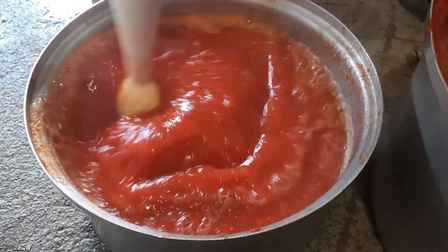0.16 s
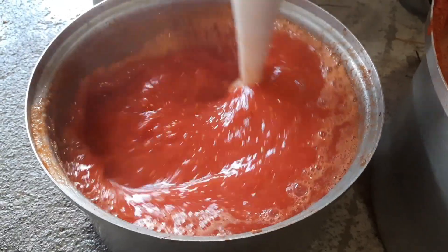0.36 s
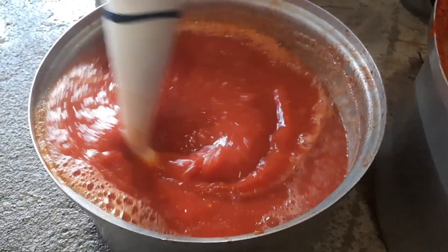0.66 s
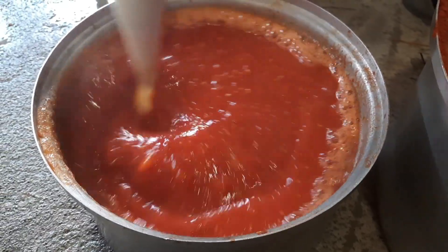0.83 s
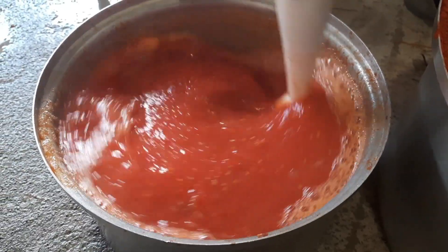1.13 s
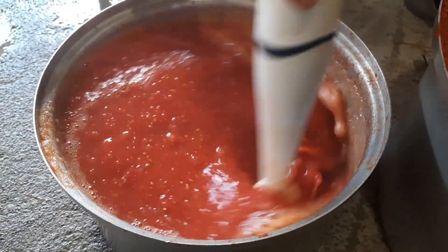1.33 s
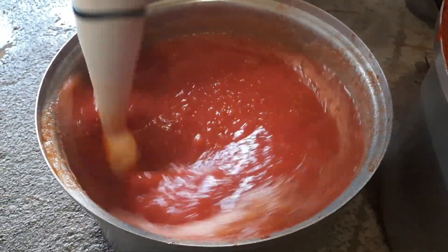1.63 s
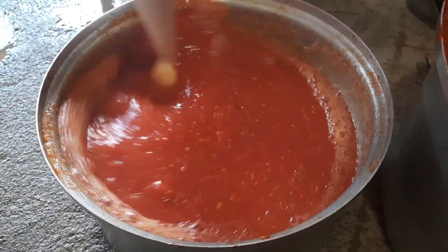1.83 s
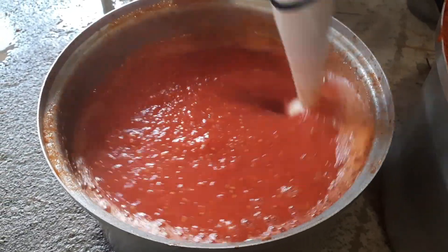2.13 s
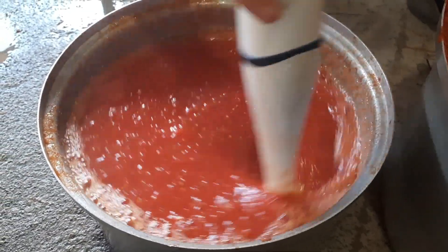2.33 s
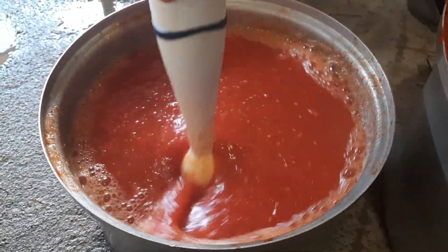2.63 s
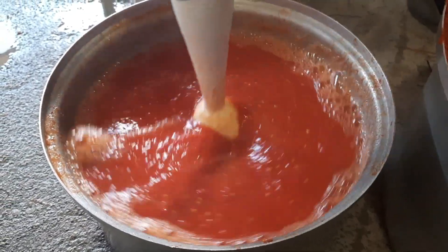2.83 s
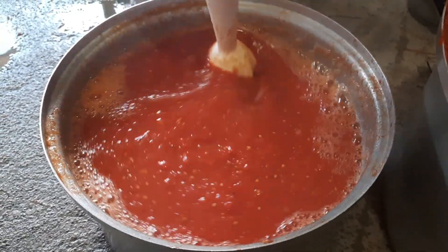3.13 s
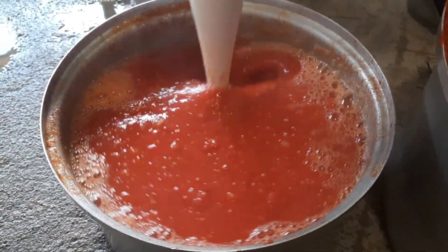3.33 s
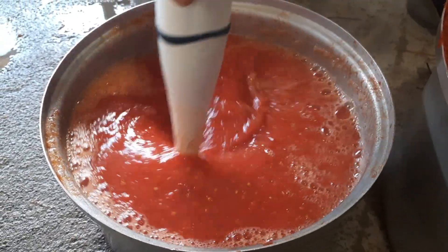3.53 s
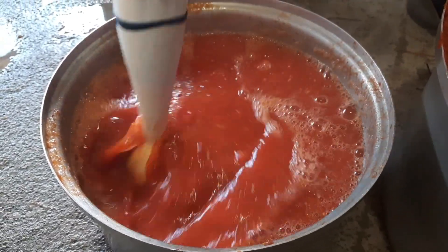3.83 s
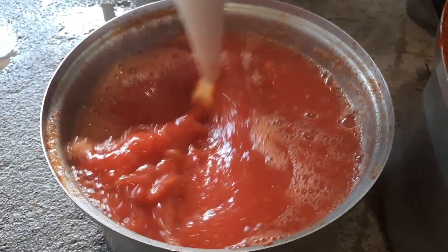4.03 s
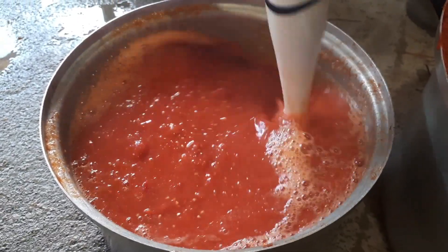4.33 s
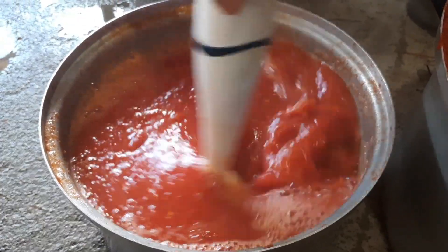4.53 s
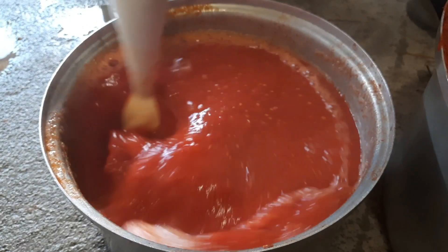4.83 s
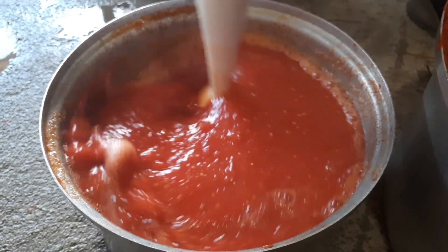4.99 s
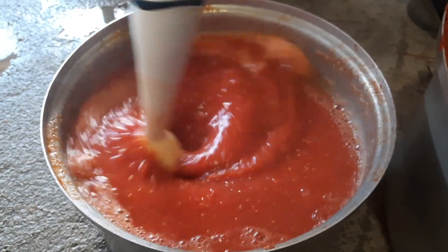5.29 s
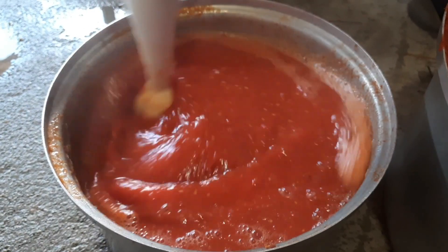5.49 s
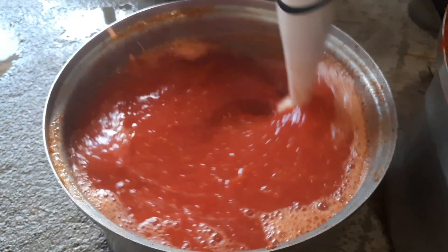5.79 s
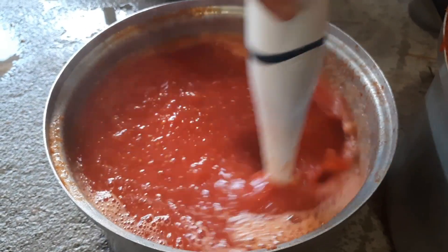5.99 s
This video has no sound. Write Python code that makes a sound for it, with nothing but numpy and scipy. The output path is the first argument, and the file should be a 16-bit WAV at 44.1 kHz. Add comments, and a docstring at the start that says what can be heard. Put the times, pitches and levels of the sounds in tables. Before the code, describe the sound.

The foot of a hand blender is dragged around a large steel pot of thick puree in uneven stop-start strokes. Each stroke is a hissing, gritty scrape, and the pot booms low beneath it. One thin, high squeak comes early. Small bubble ticks and soft bumps fill the pauses, and a few sharp clicks come in the second half. It is heard up close in a quiet, faintly humming kitchen.

```python
"""Hand blender in a steel pot

The foot of a blender is swept in stop-start strokes round a large pot of thick puree. Sliding friction
drives the steel: the low modes boom, the upper modes colour a scraping hiss, and grit rasps where the
foot presses. Stick-slip gives one squeak; bubbles tick and the foot bumps, mostly in the pauses.
A quiet kitchen hums behind, and two spaced microphones stand close to the pot."""
import sys
import numpy as np
from scipy import signal
from scipy.fft import rfft, irfft, next_fast_len
from scipy.io import wavfile
from scipy.ndimage import uniform_filter1d, map_coordinates

SR = 44100
rng = np.random.default_rng(int(sys.argv[2]) if len(sys.argv) > 2 else 0)


def wav_out(sig):
    """Save sig, one row per channel (or a flat mono array), as 16-bit PCM at SR to the path in sys.argv[1]."""
    wavfile.write(sys.argv[1], SR, np.round(np.clip(np.atleast_2d(sig).T, -1, 1) * 32767).astype(np.int16))


N = 271203
SQUEAK_FROM_S, SQUEAK_TO_S = 1.335, 1.75


def amp(db):
    """Amplitude ratio of a level in decibels."""
    return 10 ** (np.asarray(db) / 20)


def unit(x):
    """Normalisation to unit RMS."""
    return x / np.sqrt(np.mean(x ** 2) + 1e-20)


def along(points, hz):
    """Interpolation of (f/Hz, value) points on a logarithmic frequency axis."""
    f, v = np.transpose(points)
    return np.interp(np.log(hz + 1), np.log(f + 1), v)


def wobble(rate, count=N):
    """Smooth random modulation with `rate` knots a second."""
    knots = rng.standard_normal(int(count * rate / SR) + 4)
    return map_coordinates(knots, [np.arange(count) * rate / SR])


def hump(start, end, power, count=N):
    """Half-sine envelope between two times, raised to a power."""
    out, n = np.zeros(count), np.arange(max(round(start * SR), 0), min(round(end * SR), count))
    out[n] = np.abs(np.sin(np.pi * (n / SR - start) / (end - start))) ** power
    return out


def filtered(x, response):
    """Linear filtering: the spectrum of x times a frequency response."""
    m = next_fast_len(N + SR // 2)
    return irfft(rfft(x, m) * response(np.fft.rfftfreq(m, 1 / SR)), m)[..., :N]


def kitchen():
    """Ambient noise: a low hum and a faint hiss, wavering in level."""
    # room noise spectrum: f/Hz, relative level/dB
    spectrum = [(15, -53.5), (25, -41.5), (55, -22), (99, -10.5), (122, -15.5), (160, -31), (221, -23),
                (1150, -41), (2020, -36.5), (2350, -37), (2700, -51.5), (3650, -56), (3980, -37.5),
                (4350, -47), (15600, -49.5)]
    air = filtered(rng.standard_normal((2, N)), lambda hz: amp(along(spectrum, hz)))
    return amp(-58.5 + 1.5 * wobble(14)) * unit(air)


def ticks():
    """Impulsive excitation: bursting bubbles and snapping grit crack, and the pot answers faintly."""
    # cracks: t/s, peak level/dB, f/Hz, level of the duller part re the crack/dB
    cracks = [(.8854, -50, 7400, -3), (.8966, -41, 4500, 6), (.9445, -39, 8500, -20),
              (2.0572, -48, 5400, 8), (2.253, -43, 4800, 2), (3.8796, -43, 8100, -8), (3.886, -38, 900, -6),
              (3.8964, -47, 4900, 2), (4.307, -19, 4000, -10), (4.443, -19, 4000, -6),
              (4.7067, -33, 12000, -8), (4.8842, -29, 8700, -3), (4.931, -44, 11000, -20),
              (4.9445, -38, 9000, -8), (5.4995, -46, 5300, 10), (5.5785, -36, 8800, -8),
              (5.585, -35, 8000, -6), (5.601, -44, 9000, -15), (5.63, -45, 13000, -25),
              (5.679, -41, 6000, -10), (4.5455, -8, 3800, -12), (4.633, -22, 9500, 7),
              (5.2915, -10, 3600, -8), (5.2925, -19, 11000, -20), (5.305, -21, 10000, -10)]
    out, t = np.zeros((2, N + SR)), np.arange(SR // 12) / SR
    envelope = amp(-60 * t / .009) * (1 - np.exp(-t / .0004)) + amp(-24 - 60 * t / .12)  # crack + tail

    def band(hz, relative_width):
        peak = signal.iirpeak(hz, 1 / relative_width, SR)
        burst = envelope * rng.standard_normal((2, len(t)))
        x = signal.lfilter(*peak, signal.lfilter(*peak, burst))
        return x / np.abs(x).max()
    for s, db, hz, dull_db in cracks:
        tick = band(hz, .9) + amp(dull_db) * (band(2300, .73) + .7 * band(1100, .8))
        out[:, round(s * SR):][:, :len(t)] += amp(db) * tick
    return out[:, :N]


def bumps():
    """Damped oscillation: the foot knocks on the bottom, and the puree soon absorbs the motion."""
    # soft knocks: t/s, relative level/dB
    knocks = [(2.064, -28.5), (2.266, -27.5), (2.287, -30.5), (2.376, -40)]
    out, t = np.zeros(N + SR), np.arange(SR // 10) / SR
    ring = amp(2 - 60 * t / .071) * (1 - np.exp(-t / .0049)) * np.sin(2 * np.pi * 205 * t)
    for s, db in knocks:
        out[round(s * SR):][:len(t)] += amp(db) * ring
    return out[:N]


def squeak():
    """Stick-slip oscillation: the wet foot catches and slides at a rate that climbs, then drops."""
    crest_s, crest_hz, climb_hz_s2, drop_hz_s2 = 1.55, 5250, 15000, 32000
    t = np.arange(N) / SR
    hz = crest_hz - np.where(t < crest_s, climb_hz_s2, drop_hz_s2) * np.clip(t - crest_s, -.3, .3) ** 2
    phase = 2 * np.pi * np.cumsum(hz * (1 + .006 * wobble(100))) / SR
    fundamental_db = -36 - 28 * np.clip(t - SQUEAK_FROM_S, 0, 1)
    tone = amp(fundamental_db) * np.sin(phase) + amp(-59) * np.sin(2 * phase)
    return hump(SQUEAK_FROM_S, SQUEAK_TO_S, .27) * amp(2 * wobble(45)) * tone


def low_mode(hz, width_hz, purity, count=N):
    """A randomly driven resonance: a steady tone of weight `purity` plus narrow-band noise."""
    phase = 2 * np.pi * hz * np.arange(count) / SR
    in_phase, quadrature = purity + wobble(width_hz, count), wobble(width_hz, count)
    return unit(in_phase * np.cos(phase) + quadrature * np.sin(phase))


def boom(drag_db, deep_db):
    """Forced vibration: the pot's low modes follow the drag, and at set moments one booms out."""
    # modes of bottom, belly and wall: f/Hz, bandwidth/Hz, level re the drive/dB
    pot_modes = [(152.4, 22, -18.5), (204, 35, -13), (323.8, 28, -11.5)]
    # swells of a mode pulled about by foot and puree: start t/s, end t/s, f/Hz, level/dB
    booms = [(0, .23, 205, -35.5), (0.382, .52, 152, -38), (0.428, .56, 305, -34.5), (.56, .73, 240, -32.5),
             (1.09, 1.3, 152, -46), (1.178, 1.37, 325, -20.5), (1.313, 1.46, 195, -28.5),
             (1.592, 1.74, 198, -26.5), (1.738, 1.89, 205, -23), (2.7, 2.9, 157, -38),
             (3.016, 3.26, 325, -27.5), (3.092, 3.26, 165, -30.5), (3.259, 3.46, 150, -23.5),
             (3.282, 3.37, 200, -25), (3.325, 3.6, 335, -24), (3.547, 3.72, 225, -31),
             (4.152, 4.35, 320, -27.5), (4.3, 4.46, 155, -42), (4.355, 4.6, 195, -29.5),
             (4.42, 4.73, 335, -31), (4.631, 4.75, 235, -34.5), (5.28, 5.4, 210, -40.5),
             (5.808, 5.9, 152, -41), (5.807, 5.96, 310, -29.5), (5.95, 6.2, 190, -28.5),
             (5.966, 6.14, 345, -24.5)]
    faint_lift_db = .3 * np.maximum(-28 - drag_db, 0)  # the modes fade more slowly than a faint drag
    drive = amp(drag_db + deep_db + faint_lift_db)
    out = drive * sum(amp(db + 3.05 * wobble(6)) * low_mode(hz, width_hz, purity=.68)
                      for hz, width_hz, db in pot_modes)
    count = SR // 3
    for start, end, hz, db in booms:
        tone = low_mode(hz, width_hz=32, purity=.7, count=count)
        swell = amp(db) * hump(0, end - start, .84, count) * tone
        span = out[round(start * SR):][:count]
        span += swell[:len(span)]
    return out


def steel_gain(f):
    """Modal superposition: the steel's upper resonances add to a flat response."""
    # upper modes: f/Hz, bandwidth/Hz, level re the flat response/dB
    upper_modes = [(1010, 500, -11), (2247, 21, -1.5), (3790, 70, 1.5)]
    resonances = sum((-1) ** k * amp(db) * 1j * f * width / (hz * hz - f * f + 1j * f * width)
                     for k, (hz, width, db) in enumerate(upper_modes))
    return np.abs(1 + 1j * resonances)


def rasp(force):
    """Source and filter: a contact force is heard as treble noise through the upper modes."""
    # rasp spectrum: f/Hz, relative level/dB
    spectrum = [(1650, -27), (2800, -1.5), (3400, -4), (4100, -5.5), (5200, -6.5), (6680, -10.5),
                (8850, -11), (11300, -17), (15600, -21)]
    return unit(filtered(force, lambda hz: amp(along(spectrum, hz)) * steel_gain(hz)))


def grit():
    """Random micro-impacts: grit snaps in bursts where the foot presses or meets the wall."""
    # bursts: start t/s, end t/s, level/dB
    bursts = [(1.174, 1.365, -31.5), (2.816, 3.028, -34.5), (3.003, 3.168, -24.5), (3.169, 3.262, -31.5),
              (3.241, 3.397, -23), (4.283, 4.355, -36), (4.43, 4.464, -39), (4.595, 4.662, -34),
              (5.252, 5.348, -34.5), (5.908, 6.006, -24), (5.987, 6.101, -30), (6.071, 6.136, -26)]
    snaps_per_s, spread_db = 75, 11  # in each of four wide bands
    noise = signal.stft(rng.standard_normal((2, N)), nperseg=128)[2]
    shape = (4, noise.shape[2])
    snap_db = (rng.random(shape) < snaps_per_s * 64 / SR) * rng.uniform(0, spread_db, shape)
    gain = amp(np.repeat(snap_db, 17, axis=0)[:65])
    crackle = signal.istft(noise * gain, nperseg=128)[1][:, :N]
    pressure = sum(amp(db) * hump(start, end, .65) for start, end, db in bursts)
    return pressure * amp(1.2 * wobble(45)) * rasp(crackle)


def friction(lump_db, grain_db, grain_hz):
    """Friction force: noise modulated by slow lumps and short grains."""
    return amp(lump_db * wobble(35) + grain_db * wobble(grain_hz)) * rng.standard_normal((2, N))


def hiss(drag_db, hiss_db):
    """Fine friction noise: it follows the drag and swells as the foot skims during the squeak."""
    skim_db = 7 * hump(SQUEAK_FROM_S, SQUEAK_TO_S, .42)
    noise = rasp(friction(lump_db=0, grain_db=1.5, grain_hz=470))
    return filtered(amp(.79 * drag_db + hiss_db + skim_db) * noise, lambda hz: 1 / np.hypot(1, hz / 14000))


def scrape(drag_db, bright_db, deep_db):
    """Broadband excitation: sliding friction drives the steel, heard in a dull and a bright band."""
    # drag spectrum: f/Hz, relative level/dB
    spectrum = [(53, -54), (90, -19.5), (150, -15.5), (206, -8.5), (272, -2.5), (313, -11), (415, -6),
                (932, -1), (1050, -4.5), (2130, -5), (3360, -14.5), (6000, -26), (7800, -32), (13200, -120)]
    crossover_hz, deep_hz = 1600, 560
    force = friction(lump_db=1, grain_db=.5, grain_hz=287.6)
    steel = lambda hz: amp(along(spectrum, hz)) * steel_gain(hz)
    highpass = lambda hz: 1 / (1 + (crossover_hz / (hz + 1)) ** 6)
    dull = unit(filtered(force, lambda hz: steel(hz) * (1 - highpass(hz))))
    dull += (amp(deep_db) - 1) * filtered(dull, lambda hz: 1 / (1 + (hz / deep_hz) ** 6))
    bright = unit(filtered(force, lambda hz: steel(hz) * highpass(hz)))
    return amp(drag_db) * (amp(1.34) * dull + amp(bright_db - 1.3) * bright)


def stroke_levels():
    """Envelopes in dB: each stroke rises fast, holds, and decays exponentially once the foot lifts."""
    # strokes: start t/s, lift-off t/s, first level/dB, lift-off level/dB, decay/(dB/s),
    # brightness/dB, depth/dB, hiss/dB
    strokes = [(-.2, 0.054, -16, -25.5, 131, -6, -0.5, -17.5),
               (0.297, 0.643, -26, -24.5, 151, -7.5, -3, -20.5),
               (0.983, 1.289, -31.5, -19.5, 220, -3, 2.5, -17.5),
               (1.227, 1.823, -33, -29.5, 92, -6.5, 3, -21.5),
               (2.152, 2.334, -44.5, -54.5, 172, -13.5, 0.5, -26),
               (2.567, 3.606, -20.5, -24.5, 136, -7.5, -3, -20), (4.05, 4.626, -30, -25, 115, -2.5, 0, -18),
               (4.967, 5.318, -26, -22.5, 128.5, -5.5, -4.5, -17.5),
               (5.712, 6.3, -25, -25.5, 128, -2, 2.5, -19)]
    # the foot digs in: middle t/s, duration/s, drag gain/dB, brightness gain/dB
    surges = [(0.475, .12, 4, -2.5), (1.26, 0.029, 4.5, 1.5), (1.73, 0.04, 5, -14), (3.062, 0.16, 2, -2.5),
              (3.277, 0.22, 2, 3), (3.49, 0.22, 2, -12.5), (4.351, 0.29, 5.5, -8), (5.948, 0.15, 5.5, 2.5)]
    touch_s, rise_s, rise_db = .022, .036, 30.5
    t = np.arange(N) / SR
    levels = []
    for start, lift, first_db, lift_db, decay, *_ in strokes:
        touch_db = 20 * np.log10(np.clip((t - start) / touch_s, 1e-5, 1))
        attack_db = touch_db - rise_db * np.exp(-np.abs(t - start) / rise_s)
        held_db = np.interp(t, [start, lift], [first_db, lift_db])
        levels.append(attack_db + held_db - decay * np.maximum(t - lift, 0))
    drag_db, loudest = np.max(levels, axis=0), np.argmax(levels, axis=0)
    bright_db, deep_db, hiss_db = uniform_filter1d(np.array(strokes)[loudest, 5:].T, size=2000)
    bright_db += .2139 * np.clip(-41.5 - drag_db, 0, 40)  # faint dragging is brighter
    swells = np.array([hump(s - length / 2, s + length / 2, 1.4) for s, length, *_ in surges])
    gain_db, shine_db = np.array(surges)[:, 2:].T @ swells
    return drag_db + gain_db, bright_db + shine_db, deep_db, hiss_db


def moving(pair, patchy_db, phase_rad, share):
    """Varying transfer paths: as the foot travels, gain and phase drift in time-frequency patches."""
    def patches(bins, frames):
        rough = rng.standard_normal((257, N // 256 + 2))
        return unit(uniform_filter1d(uniform_filter1d(rough, bins, 0), frames, 1))
    first, second = signal.stft(pair, nperseg=512)[2]
    shifted = first * np.exp(1j * phase_rad * patches(6, 30))
    second = np.sqrt(share) * shifted + np.sqrt(1 - share) * second
    gain = amp(patchy_db * patches(4, 12))
    return signal.istft(np.array([first, second]) * gain, nperseg=512)[1][:, :N]


def microphones(pair):
    """Partial coherence: two signals mix as mid and side, so left and right agree most in the bass."""
    # likeness of left and right: f/Hz, coherence
    coherence = [(60, 0.9), (130, 0.94), (290, 0.56), (640, 0.84), (1410, 0.14), (3100, 0.054),
                 (6820, 0.054), (15000, 0.036)]
    # balance: f/Hz, left minus right level/dB
    balance = [(60, 0.5), (110, -1), (200, -3), (380, -2), (700, 2.0), (1290, 3), (2380, 7), (4400, -5.5),
               (8120, -4), (15000, 14.5)]
    angle = lambda hz: np.arccos(np.clip(along(coherence, hz), -1, 1)) / 2
    mid, side = filtered(pair, lambda hz: np.array([np.cos(angle(hz)), np.sin(angle(hz))]))
    left_right = np.array([mid + side, mid - side])
    return filtered(left_right, lambda hz: amp(np.outer([.5, -.5], along(balance, hz))))


def scene():
    """Superposition of the kitchen, the ticks, the pot's tones and the rubbing of the foot."""
    drag_db, bright_db, deep_db, hiss_db = stroke_levels()
    tones = boom(drag_db, deep_db) + squeak() + bumps()
    rubbing = scrape(drag_db, bright_db, deep_db) + hiss(drag_db, hiss_db) + grit()
    rubbing = moving(rubbing, patchy_db=2.24, phase_rad=1.57 * np.pi, share=.37)
    return microphones(rubbing + ticks() + kitchen() + tones * [[1], [.6]])


def record(dry):
    """Band limiting: an ideal low-pass filter removes the highest treble."""
    return filtered(dry, lambda hz: hz < 15760)


dry = scene()
out = record(dry)
wav_out(out)
```